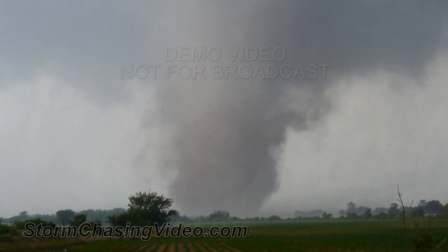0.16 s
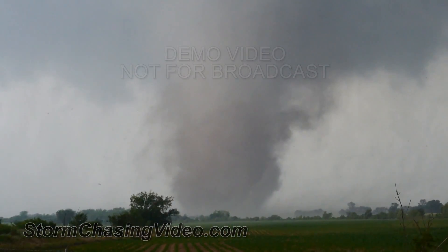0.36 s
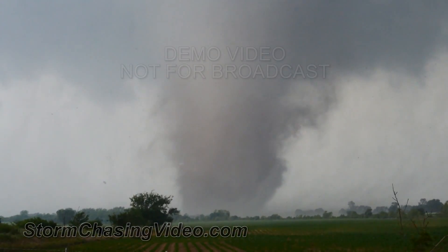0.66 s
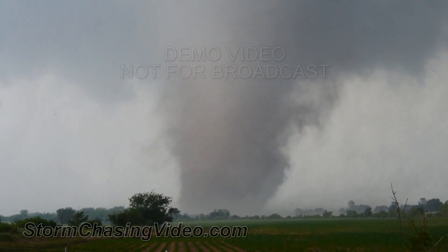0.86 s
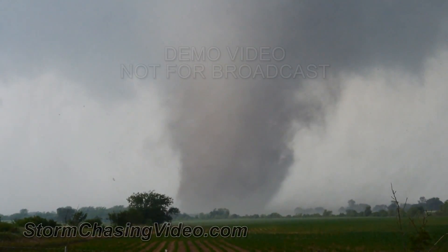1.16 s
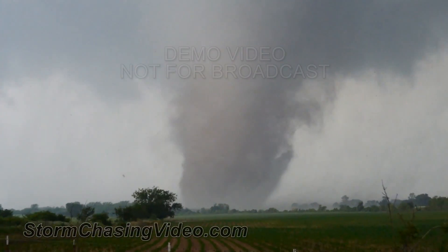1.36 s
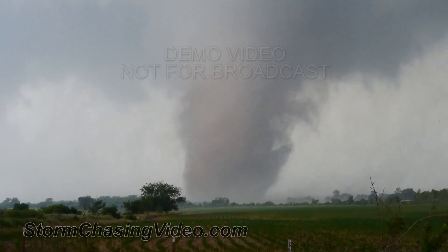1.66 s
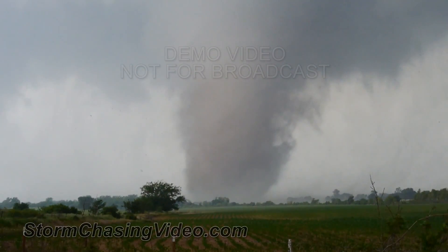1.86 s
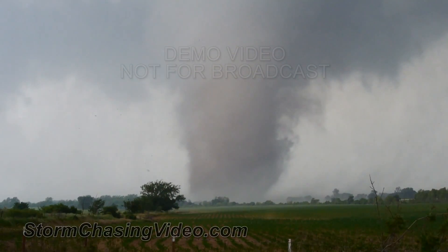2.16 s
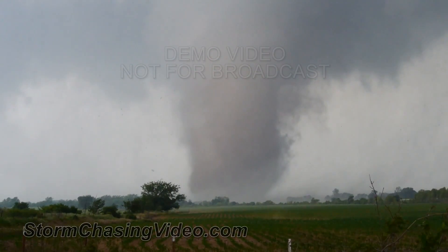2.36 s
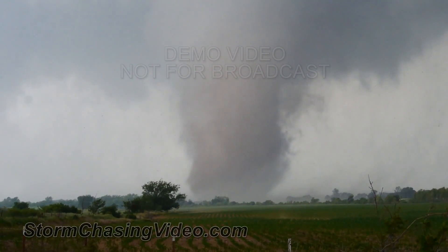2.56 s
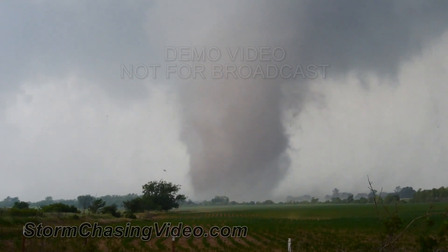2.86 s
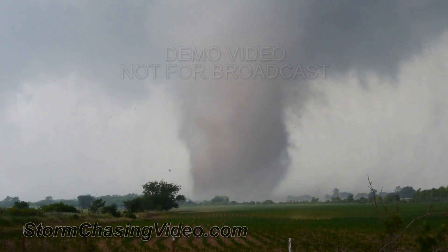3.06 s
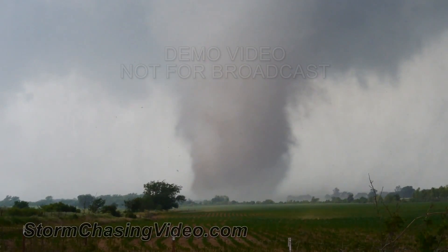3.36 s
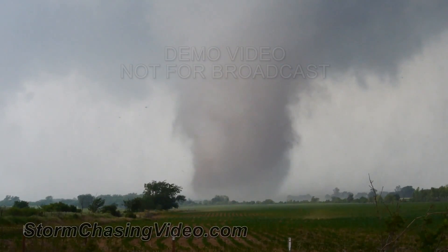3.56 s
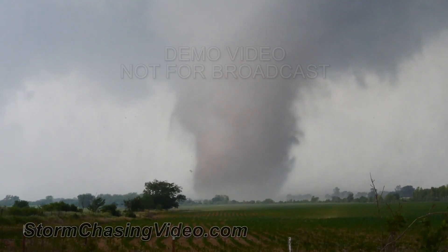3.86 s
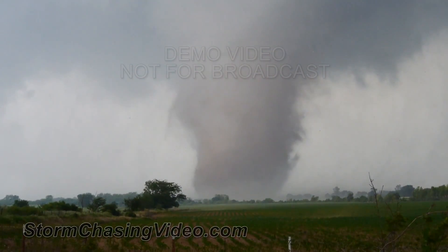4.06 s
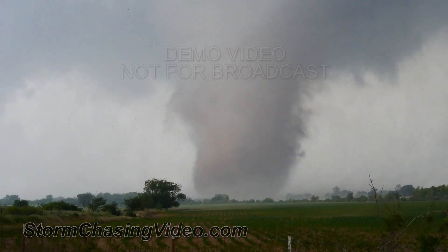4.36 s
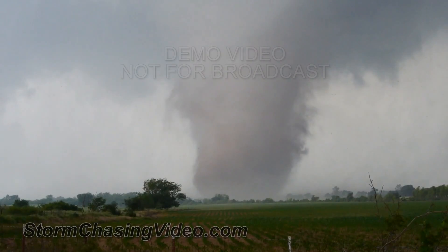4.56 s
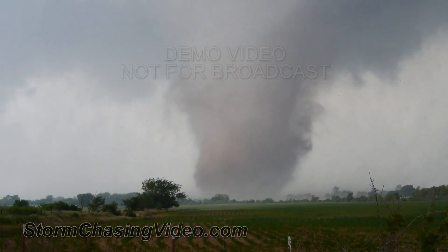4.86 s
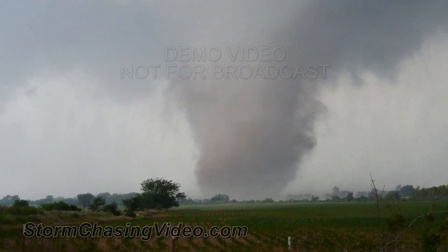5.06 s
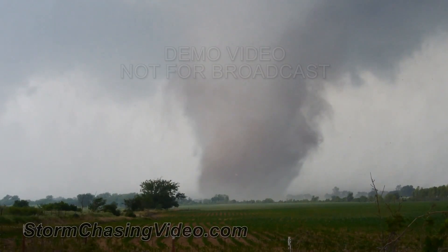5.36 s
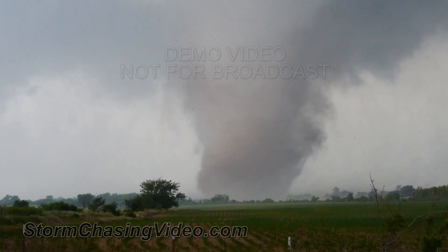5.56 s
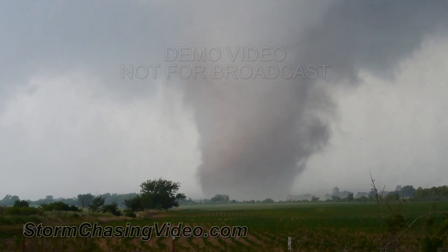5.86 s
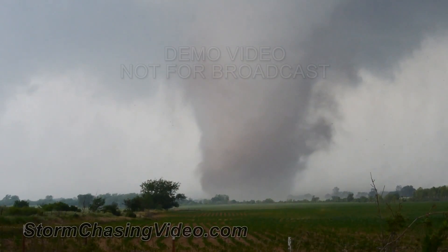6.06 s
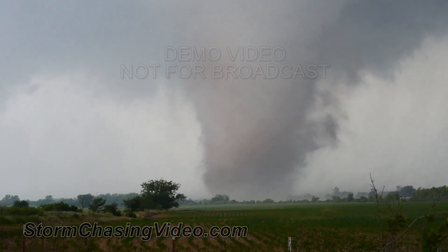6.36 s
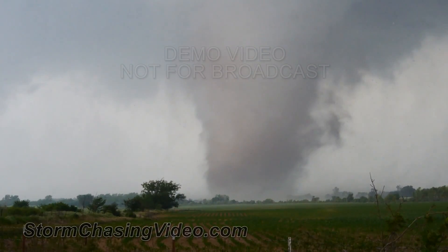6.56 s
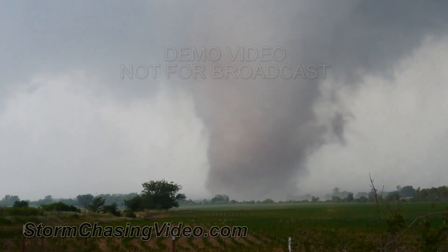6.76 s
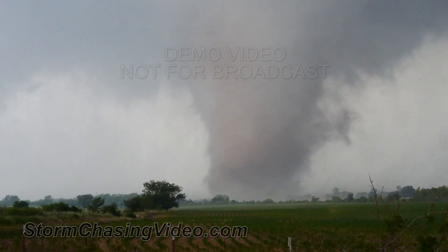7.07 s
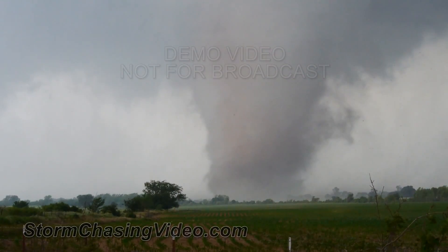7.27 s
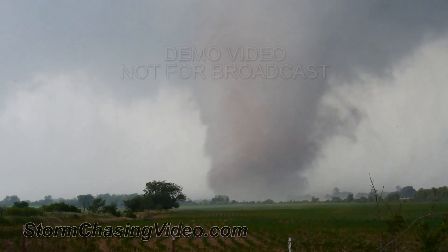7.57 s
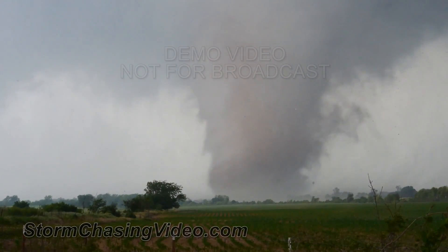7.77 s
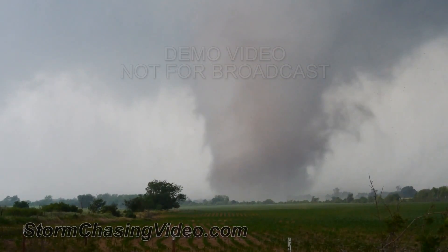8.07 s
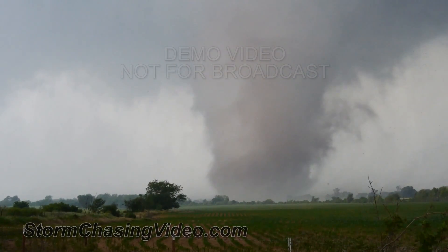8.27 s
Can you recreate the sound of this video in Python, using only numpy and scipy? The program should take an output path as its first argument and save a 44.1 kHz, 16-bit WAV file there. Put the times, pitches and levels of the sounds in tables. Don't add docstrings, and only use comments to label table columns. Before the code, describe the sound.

Wind gusts thump and flutter hard against a microphone while a large tornado's low steady roar grows slowly over open fields with hissing crops.

```python
import sys
import numpy as np
from scipy import signal
from scipy.fft import rfft, irfft, next_fast_len
from scipy.io import wavfile
from scipy.ndimage import uniform_filter1d

SR = 44100
rng = np.random.default_rng(int(sys.argv[2]) if len(sys.argv) > 2 else 0)


def volts(x):
    e = np.asarray(x, float) / 20
    return 10 ** e


def int16_out(signal):
    q = np.round(np.clip(np.atleast_2d(signal).T, -1, 1) * 32767)
    wavfile.write(sys.argv[1], SR, q.astype(np.int16))


N = 370440

# (time [s], roar above crop hiss [dB])
APPROACH = [(0.0, 6.5), (0.42, 6.5), (0.72, 8), (0.95, 6.5), (1.4, 9), (1.8, 8), (2.3, 10), (2.85, 12),
            (3.25, 10.5), (3.45, 12), (4.1, 11.5), (4.5, 12.5), (5.2, 13), (6.05, 14.5), (6.5, 14.5),
            (7.0, 13), (7.7, 16), (8.4, 14)]


def rms_one(x):
    return x / np.sqrt(np.mean(x ** 2) + 1e-20)


def in_time(rows):
    s, *columns = np.transpose(rows)
    return [np.interp(np.arange(N) / SR, s, column) for column in columns]


def drift(rate_hz):
    step = 40
    settle = 2000
    pole = np.exp(-2 * np.pi * rate_hz * step / SR)
    noise = rng.standard_normal(N // step + settle + 2)
    slow = signal.lfilter([1], [1, -2 * pole, pole ** 2], noise)[settle:]
    return np.interp(np.arange(N) / step, np.arange(len(slow)), rms_one(slow))


def turbulence(spectrum, patchy_db=0, rate_hz=8, count=1):
    size = next_fast_len(N)
    bins = np.maximum(np.arange(size // 2 + 1), .1)
    octave = np.log2(bins * SR / size)
    hz, level_db = np.transpose(spectrum)
    colour_db = np.interp(octave, np.log2(hz), level_db, left=-200, right=-200)
    coloured = rfft(rng.standard_normal(size)) * volts(colour_db)
    centres = np.linspace(np.log2(hz[1]), np.log2(hz[-2]), count)
    total = np.zeros(N)
    for own in np.eye(count):
        band = irfft(coloured * np.interp(octave, centres, own), size)[:N]
        total += volts(patchy_db * drift(rate_hz)) * band
    return rms_one(total)


def evened(x, seconds, share):
    width = int(seconds * SR)
    swell = uniform_filter1d(uniform_filter1d(x ** 2, width), width)
    return rms_one(x / (swell + 0.015) ** (share / 2))


def passing(s, peak_db, width_s, calm_db):
    t = np.arange(0, N + 40, 40) / SR
    from_peak = 2 * (t - s[:, None]) / width_s[:, None]
    bells = volts(peak_db)[:, None] ** 2 * 2.0 ** -from_peak ** 2
    eddy_power = np.interp(np.arange(N) / SR, t, bells.sum(axis=0))
    return np.sqrt(volts(calm_db) ** 2 + eddy_power)


def nearer(x, lift, top_hz):
    high_pass = signal.butter(2, top_hz, "high", fs=SR, output="sos")
    return x + lift * signal.sosfiltfilt(high_pass, x)


def gain_control():
    # (time [s], level of the crop hiss just after [dB])
    pushes = [(0.0, -42.5), (0.27, -43), (0.5, -42.5), (0.78, -43), (0.95, -43), (1.3, -42), (1.58, -40.5),
              (1.87, -42.5), (2.13, -43), (2.37, -44), (2.62, -45.5), (3.1, -42), (3.44, -44), (3.82, -43),
              (4.12, -44.5), (4.52, -43), (4.86, -42), (5.05, -41.5), (5.6, -38.5), (5.85, -38),
              (6.14, -37.5), (6.3, -40), (6.6, -39.5), (6.87, -44.5), (7.1, -43.5), (7.4, -44.5),
              (7.76, -44), (8.34, -39.5)]
    ceiling_db, recover_s, push_s = -30, 1.65, 0.085
    s, after_db = np.transpose(pushes)
    t = np.arange(N) / SR
    last = np.maximum(np.searchsorted(s, t) - 1, 0)
    creep = np.exp(-(t - s[last]) / recover_s)
    level_db = ceiling_db + (after_db[last] - ceiling_db) * creep
    return uniform_filter1d(level_db, int(push_s * SR), mode="nearest")


def ticks():
    # (time [s], peak level [dB])
    tick_times = [(2.1494, -55), (3.47, -50), (3.8444, -56), (4.153, -45), (4.1564, -50), (5.1394, -57),
                  (6.381, -44), (6.8574, -51), (6.8934, -48), (6.9384, -53), (7.432, -50)]
    clicks = np.zeros(N)
    for s, peak_db in tick_times:
        clicks[round((s + .0008) * SR)] = volts(peak_db + 13)
    high_pass = signal.butter(2, 5000, "high", fs=SR, output="sos")
    return signal.sosfilt(high_pass, clicks)


def squeaks():
    # (start [s], length [s], first pitch [Hz], last pitch [Hz], level [dB])
    slips = [
        (.883, .021, 1990, 2300, -39.5),
        (.904, .012, 1920, 1900, -48),
        (.912, .016, 2240, 2330, -39.5),
        (.926, .035, 2065, 2050, -48),
        (.961, .021, 1960, 1955, -52),
        (1.108, .068, 2000, 2170, -54),
        (6.963, .014, 1950, 2100, -43),
    ]
    edge = .15
    out = np.zeros(N)
    unsteady = 1 + .005 * drift(200)
    flicker = volts(1.5 * drift(90))
    for start, length, first_hz, last_hz, level_db in slips:
        along = np.linspace(0, 1, int(length * SR))
        span = int(start * SR) + np.arange(len(along))
        pitch_hz = (first_hz + (last_hz - first_hz) * along) * unsteady[span]
        phase = 2 * np.pi * np.cumsum(pitch_hz) / SR
        fall_db = 5 + .35 * max(level_db + 50, 0)
        stack = sum(volts((1 - k) * fall_db) * np.sin(k * phase) for k in range(1, 7))
        fade = np.clip(np.minimum(along, 1 - along) / edge, 0, 1)
        out[span] += fade * volts(level_db) * flicker[span] * stack
    return out


def buffeting():
    # (frequency [Hz], density [dB per Hz])
    swing_colour = [(2, -30), (4, -12), (6, -1), (10, 0), (18, -1), (24, -9), (32, -41)]
    thump_colour = [(15, -45), (20, 3), (26, 10), (52, 6), (66, -17), (85, -60)]
    flutter_colour = [(42, -34), (54, -7.5), (66, 0.5), (110, -5.5), (150, -10.5), (190, -15.5), (260, -70)]
    # (time [s], peak level [dB], width [s])
    large_eddies = [(0.44, -22, 0.059), (0.69, -22, 0.073), (0.93, -16, 0.054), (1.15, -11.5, 0.063),
                    (1.32, -14.5, 0.07), (1.48, -10, 0.033), (1.66, -16, 0.039), (1.85, -14, 0.17),
                    (2.12, -10, 0.043), (2.34, -7.5, 0.042), (2.46, -6.5, 0.033), (2.62, -8.5, 0.11),
                    (2.99, -18, 0.1), (3.46, -8, 0.096), (3.73, -15.5, 0.2), (4.15, -9, 0.14),
                    (4.38, -14.5, 0.044), (4.52, -10.5, 0.096), (4.86, -12.5, 0.12), (5.05, -10, 0.057),
                    (6.29, -13, 0.24), (6.57, -13.5, 0.087), (6.73, -11.5, 0.085), (6.9, -6, 0.091),
                    (7.1, -8.5, 0.089), (7.27, -15.5, 0.07), (7.46, -12, 0.083), (7.76, -12.5, 0.15),
                    (7.85, -10, 0.034), (8.08, -14.5, 0.068)]
    small_eddies = [(0.08, -21, 0.06), (0.25, -9.5, 0.056), (0.39, -16.5, 0.07), (0.52, -15.5, 0.085),
                    (0.78, -12.5, 0.12), (1.45, -18.5, 0.12), (1.58, -16.5, 0.038), (1.88, -14, 0.17),
                    (2.13, -15, 0.084), (2.27, -23, 0.07), (2.39, -14.5, 0.086), (2.56, -25, 0.1),
                    (2.83, -15.5, 0.033), (3.01, -54, 0.058), (3.22, -39, 0.09), (3.46, -22, 0.087),
                    (3.81, -17, 0.063), (4.14, -20, 0.072), (4.62, -19.5, 0.1), (4.79, -35, 0.042),
                    (4.87, -19, 0.07), (5.43, -24, 0.069), (6.69, -19, 0.059), (6.93, -10, 0.075),
                    (7.11, -18, 0.1), (7.3, -28, 0.05), (7.4, -13.5, 0.12), (7.64, -15.5, 0.089),
                    (7.78, -11.5, 0.042), (8.26, -25, 0.063)]
    puffs = [(0.21, -20, 0.11), (0.55, -27, 0.17), (0.73, -23, 0.11), (1.2, -28, 0.07), (1.58, -26.5, 0.12),
             (1.83, -27, 0.13), (2.08, -27, 0.32), (2.81, -32, 0.028), (3.62, -29, 0.1), (3.82, -32, 0.056),
             (4.06, -35, 0.062), (4.53, -27.5, 0.23), (4.83, -27, 0.094), (5.0, -25, 0.06),
             (5.39, -24.5, 0.085), (5.61, -23, 0.1), (5.84, -22.5, 0.066), (6.16, -21, 0.045),
             (6.23, -19, 0.084), (6.41, -26, 0.041), (6.64, -23.5, 0.11), (6.86, -29, 0.064),
             (6.95, -26, 0.13), (7.17, -24, 0.08), (7.38, -20.5, 0.09), (7.49, -20.5, 0.044),
             (7.64, -24.5, 0.089), (7.79, -25, 0.087), (8.16, -22, 0.067), (8.34, -19.5, 0.053)]

    gain_db = gain_control()
    climb_db = gain_db - gain_db.mean()
    lull_db = np.maximum(climb_db, 0)
    flutter_calm_db = 10.5 + gain_db.mean() + 0.6 * climb_db + 0.17 * in_time(APPROACH)[0]

    swings = volts(-0.5) * evened(turbulence(swing_colour), seconds=0.18, share=0.95)
    swings *= passing(*np.transpose(large_eddies), -20 - lull_db)
    thumps = evened(turbulence(thump_colour), seconds=0.059, share=0.55)
    thumps *= passing(*np.transpose(small_eddies), -27 - lull_db)
    flutter = evened(turbulence(flutter_colour), seconds=0.11, share=1.0)
    flutter *= passing(*np.transpose(puffs), flutter_calm_db)
    return swings + thumps + flutter


def storm():
    # (frequency [Hz], density [dB per Hz])
    roar_colour = [(130, -14), (190, -3.5), (290, -1), (400, -3), (560, -9), (750, -20.5), (1000, -29)]
    rush_colour = [(350, -52), (500, -9), (650, -2), (1000, -5), (1500, -9.5), (1900, -13), (2500, -20.5),
                   (3300, -40)]
    hiss_colour = [(1500, -39), (2000, -13.5), (2400, -3), (2800, -0.5), (3300, 0), (4000, -6), (4600, -12),
                   (5600, -27)]
    leaf_colour = [(3600, -28.5), (4500, -3.5), (5200, -1.5), (6500, -8), (8000, -13.5), (9500, -21),
                   (11000, -27), (14000, -31)]

    hiss_db = gain_control()
    roar_db = in_time(APPROACH)[0]
    roar = volts(roar_db) * evened(turbulence(roar_colour), seconds=0.63, share=0.11)
    rush_db = -1 + 0.43 * roar_db
    rush = volts(rush_db) * evened(turbulence(rush_colour), seconds=0.085, share=0.28)
    hiss = turbulence(hiss_colour, patchy_db=0.42, rate_hz=5.6, count=3)
    leaves = volts(-11.5) * turbulence(leaf_colour, patchy_db=0.15, rate_hz=11, count=4)

    growth_db = uniform_filter1d(roar_db - roar_db.mean(), 2 * SR, mode="nearest")
    rush = nearer(rush, .12 * growth_db, top_hz=1950)
    leaves = nearer(leaves, .09 * growth_db, top_hz=9800)
    unrest = volts(0.29 * drift(24))
    return volts(hiss_db) * (roar + unrest * (rush + hiss + leaves))


def scene():
    swing_limit = .95
    capsule = swing_limit * np.tanh(buffeting() / swing_limit)
    capsule = capsule + storm() + squeaks() + ticks()
    return np.array([capsule, capsule])


def band_limit(x):
    return signal.sosfilt(signal.butter(12, 14210, fs=SR, output="sos"), x)


def record(dry):
    wobble = volts(-39) * drift(1.8) * np.array([[1], [-1]])
    hiss_db = -72 + .8 * (gain_control() + 39.5)
    hiss = volts(hiss_db) * rng.standard_normal((2, N))
    top_cut = signal.ellip(12, .3, 50, 13660, fs=SR, output="sos")
    ebb = np.minimum(1, .25 + (N - np.arange(N)) / (.006 * SR))
    mix = ebb * signal.sosfilt(top_cut, dry * (1 + wobble) + hiss)
    return band_limit(mix)


dry = scene()
out = record(dry)
int16_out(out)
```